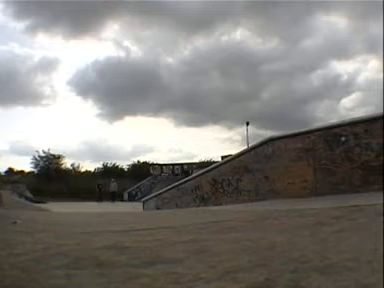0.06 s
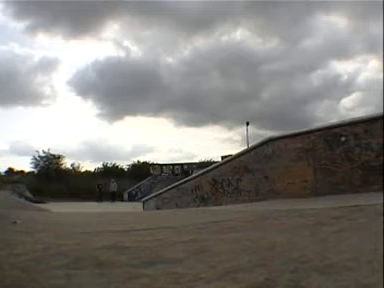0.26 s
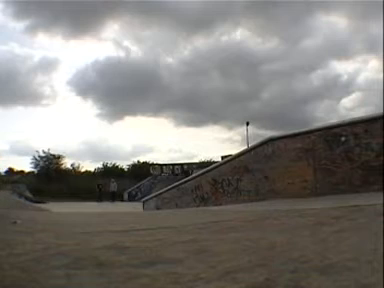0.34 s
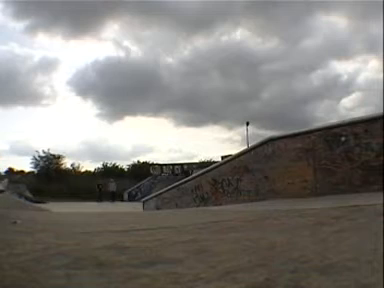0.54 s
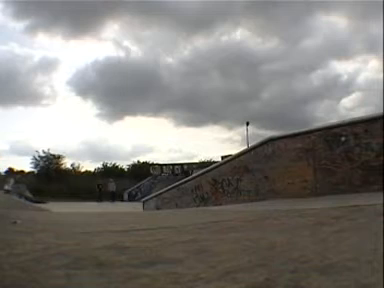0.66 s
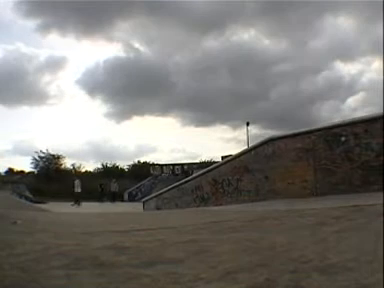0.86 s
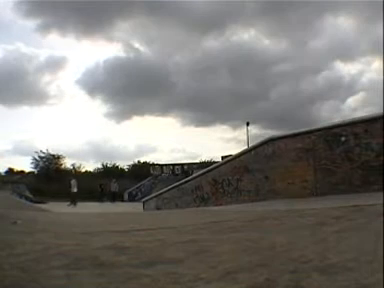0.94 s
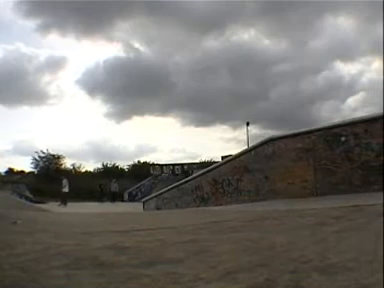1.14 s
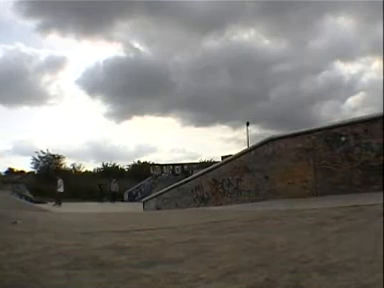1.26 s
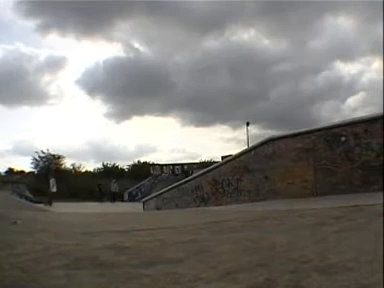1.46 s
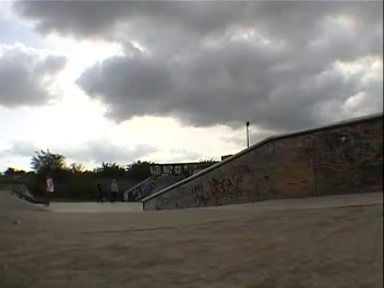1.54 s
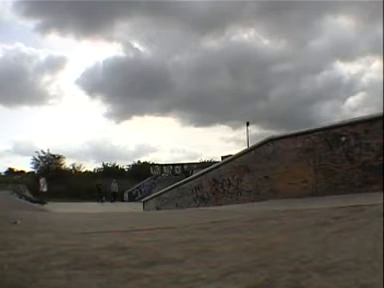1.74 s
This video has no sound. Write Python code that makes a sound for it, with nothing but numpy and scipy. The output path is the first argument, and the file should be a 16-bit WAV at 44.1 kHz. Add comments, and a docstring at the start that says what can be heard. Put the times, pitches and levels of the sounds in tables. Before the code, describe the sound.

Skates thump across a hollow ramp close to the microphone, clacking three times as the panels ring briefly. The wheels then roll away over rough concrete, with a few small distant clacks and a steady low hum in an outdoor skatepark.

```python
"""A skater crosses a hollow ramp close by in an outdoor skatepark.
The wheels thump on its panels and set them ringing, and the hard skates clack three times.
The wheels then roll away over rough concrete, with a few small clacks from farther off, above
a steady outdoor hum. Ramps and walls add a thin echo. The recorder's motor-noise filter cuts
a row of narrow gaps in the sound, and its input rounds the loudest peaks."""
import sys
import numpy as np
from scipy import signal
from scipy.fft import rfft, irfft
from scipy.io import wavfile

SR = 44100
rng = np.random.default_rng(int(sys.argv[2]) if len(sys.argv) > 2 else 0)


def unload_wav(signal):
    """Save mono or channel-first audio to the path in sys.argv[1] as 16-bit WAV at rate SR, clipped to [-1, 1]."""
    wavfile.write(
        sys.argv[1],
        SR,
        np.round(np.clip(np.atleast_2d(signal).T, -1, 1) * 32767).astype(np.int16),
    )


N = 79380
TIME = np.arange(N) / SR
HZ = np.maximum(np.fft.rfftfreq(N, 1 / SR), 1)
TILT_PIVOT_HZ = 360  # a positive tilt boosts the sound above this pitch and weakens it below

# Tone of the bright rattle in a clack. Each row: frequency in Hz, relative level in dB.
RATTLE_TONE = [(1200, -50), (2800, 5), (3800, -3.5), (4600, 0), (6000, 4.5), (7800, 1.5), (9200, -11.5),
               (11000, -19), (13000, -43.5), (16000, -44)]


def ramp():
    """Wheels strike the hollow ramp: its frame booms, its panels knock and each struck spot rings."""
    # Each row: start in seconds, frame boom in dB, panel knock in dB, knock tilt in dB per octave,
    # then the spot's own note: level in dB, pitch in Hz, fade time in seconds.
    knocks = [(.240, -46, -31, 8.5, -33.5, 649, 0.22), (0.3483, -30, -8.5, 1, -14, 818, 0.041),
              (.3555, -28, -11, -2, -5.5, 399, 0.059), (.365, -25, -13, -7, -9.5, 264, 0.078),
              (.424, -28, -23, 5.5, -23, 131.2, 0.32), (0.7225, -11, -13, -1, -10.5, 489, 0.066),
              (0.7291, -36, -22.5, 3, -12, 662, .08), (0.7363, -16, -18.5, -1, -12.5, 169.7, .1),
              (0.8811, -49, -16.5, 3, -23, 371, 0.14), (.907, -33, -19.5, -1, -14, 274.6, 0.15)]
    # Notes of the frame and the panels. Each row: pitch in Hz, level in dB, fade time in seconds.
    frame_notes = [(82, -3.5, 0.17), (162, -3.5, 0.12)]
    panel_notes = [(208.8, -10.5, 0.15), (254.8, -5, 0.23), (332.2, -5.5, 0.21), (413.8, -6.5, 0.12),
                   (520.4, -10.5, 0.2), (706.6, -9.5, 0.11), (784, -13, 0.11)]
    # Many weaker notes blur into a thud. Each row: frequency in Hz, relative level in dB.
    thud_tone = [(25, -47), (60, -22.5), (160, -20.5), (230, 7.5), (500, 10), (800, -7.5), (1100, -9.5),
                 (2000, -34), (6000, -63)]
    # Soft, low bumps before the landing. Each row: start in seconds, level in dB, pitch in Hz.
    soft_bumps = [(0.1714, -15, 108.7), (0.209, -12, 119)]
    bumps = sum(note(start, db, hz, fade_s=0.08) for start, db, hz in soft_bumps)
    frame = ring(frame_notes, [(start, db, 0) for start, db, *_ in knocks])
    panels = ring(panel_notes, [(start, db - 1.5, tilt) for start, _, db, tilt, *_ in knocks])
    hollow = sum(note(start, db, hz, fade_s) for start, *_, db, hz, fade_s in knocks)
    octaves = np.clip(np.log2(HZ / TILT_PIVOT_HZ), -1, 2)
    thud = 0
    for start, _, db, tilt, *_ in knocks:
        tilted_tone = tone(thud_tone) * from_db(tilt * octaves)
        thud += from_db(db - 2.5) * blow(start, fade_s=0.15) * noise(tilted_tone)
    low_cut = signal.butter(2, 63, "high", fs=SR, output="sos")
    return signal.sosfilt(low_cut, thud + panels + hollow + frame - bumps)


def skates():
    """The skates' wheels, frames and shells clack, scrape and ring, with a gritty bright rattle."""
    # Each row: start in seconds, clack in dB, rattle in dB, scrape length and fade time in seconds.
    hits = [(0.3485, -21.5, -41, .0005, .06), (0.3551, -14, -37, 0.0022, 0.079),
            (0.3646, -20, -27, .003, .06), (.372, -21, -31, 0.0096, 0.13), (0.42, -24, -39.5, 0.016, 0.088),
            (0.485, -27.5, -39.5, 0.021, 0.089), (.538, -38, -48, 0.034, 0.065),
            (.604, -46, -52, 0.018, 0.08), (0.69, -31.5, -50.5, 0.0019, 0.065),
            (0.7217, -27, -62, 0.00093, 0.025), (0.7353, -21.5, -45, 0.00089, 0.032),
            (.8796, -24, -28.5, .0003, .1), (0.891, -31, -33, 0.012, 0.12), (.907, -28.5, -33, .013, 0.25)]
    # Tone of a clack. Each row: frequency in Hz, relative level in dB.
    clack_tone = [(200, -26), (600, 9.5), (1000, 3.5), (1700, 2), (2400, -3), (3300, -13.5), (5000, -25),
                  (14000, -55)]
    # Notes of the hard parts. Each row: pitch in Hz, level in dB, fade time in seconds.
    skate_notes = [(1247, 2, 0.13), (1582, -11, 0.13), (1756, -12, 0.36), (1910, -17, 0.1),
                   (1980, -16.5, 0.35), (2490, -13, 0.1), (3760, -8.5, 0.099)]
    clack_level = blows([(db, start, fade_s, scrape_s) for start, db, _, scrape_s, fade_s in hits])
    rattle_level = blows([(db, start, fade_s, scrape_s) for start, _, db, scrape_s, fade_s in hits])
    clatter = clack_level * noise(tone(clack_tone)) + rattle_level * noise(tone(RATTLE_TONE))
    # A clack that is damped sooner rings more weakly.
    ring_db, free_fade_s = -5, 0.18
    strikes = [(start, db + ring_db + 20 * np.log10(fade_s / free_fade_s), 0)
               for start, db, _, _, fade_s in hits]
    ringing = ring(skate_notes, strikes)
    return pan(clatter * grain(depth_db=2.5) + ringing, right_db=3.5)


def snaps():
    """A wheel's first hard contact gives a tiny burst of crackle."""
    # Each row: start in seconds, level in dB.
    contacts = [(0.349, -36), (.356, -27), (0.366, -24), (.7228, -44), (0.7366, -27.5), (.8803, -36)]
    decay_s, top_hz = 0.0007, 7000
    level = sum(from_db(db) * (TIME >= start) * np.exp(-np.abs(TIME - start) / decay_s)
                for start, db in contacts)
    return signal.sosfilt(signal.butter(1, top_hz, fs=SR, output="sos"), level * noise(1))


def rolling():
    """The wheels rumble on the ramp, then roar more brightly on rough concrete."""
    # Loudness of the rolling. Each row: time in seconds, level in dB.
    levels = [(0, -39), (.33, -39.5), (.45, -33), (.65, -32.5), (.84, -43.5), (1.0, -33.5), (1.2, -33),
              (1.62, -34), (1.8, -38.5)]
    # Tone of each surface. Each row: frequency in Hz, relative level in dB.
    ramp_tone = [(25, -17), (60, 0), (95, -7.5), (128, 6), (170, -5), (245, 7), (310, -5), (380, -2),
                 (650, -3), (1000, -14.5), (1800, -18), (2400, -24.5), (7000, -37.5), (14000, -67)]
    concrete_tone = [(40, -21), (130, -25), (300, -4.5), (520, 3), (800, -1), (1250, -2), (1800, -6),
                     (2300, -21.5), (4000, -29), (7500, -34), (12000, -49.5), (15000, -68)]
    leaves_ramp_s, crossing_s = 1.083, 0.79
    concrete_share = np.clip(0.5 + (TIME - leaves_ramp_s) / crossing_s, 0, 1)
    on_ramp = np.sqrt(1 - concrete_share) * noise(tone(ramp_tone))
    on_concrete = np.sqrt(concrete_share) * noise(tone(concrete_tone))
    return loudness(levels) * grain(depth_db=2) * (on_ramp + on_concrete)


def whine():
    """The rolling wheels sing briefly around one pitch."""
    # Each row: time in seconds, level in dB.
    levels = [(1.0, -64), (1.36, -55), (1.425, -41.5), (1.485, -36.5), (1.65, -68)]
    return loudness(levels) * noise(band(1626, width_octaves=0.022))


def far_clacks():
    """Small clacks farther off each ring around one pitch; the harder ones have a crisp top."""
    # Each row: start in seconds, level in dB, pitch in Hz, crisp top in dB.
    hits = [(.168, -39, 1640, -71), (.687, -36.5, 3450, -63), (0.6879, -28, 1500, -68),
            (1.462, -43, 3000, -67), (1.513, -38, 3340, -55), (1.528, -38.5, 2980, -58),
            (1.5806, -33, 3570, -47), (1.634, -29, 1750, -65), (1.728, -45, 3340, -56),
            (1.734, -32, 780, -64)]
    crisp = noise(band(7450, width_octaves=0.48) * tone(RATTLE_TONE) ** 0.25)
    clacks = 0
    for start, db, hz, top_db in hits:
        body = from_db(db) * noise(band(hz, width_octaves=0.23))
        clacks += blow(start, fade_s=0.05, scrape_s=0.0037) * (body + from_db(top_db) * crisp)
    return grain(depth_db=4) * clacks


def park_echo(sound):
    """Ramps and walls scatter the sound into a thin tail."""
    # Tone of the echo. Each row: frequency in Hz, relative level in dB.
    echo_tone = [(60, 6.5), (250, 1), (600, 0.5), (1500, -10), (3000, 2.5), (7000, -8), (12000, -4)]
    echo_db, build_s, fade_s = -15.5, 0.0078, 0.79
    shape = (1 - np.exp(-TIME / build_s)) * from_db(-60 * TIME / fade_s)
    tail = unit_level(noise(tone(echo_tone)) * shape) / np.sqrt(N)
    return from_db(echo_db) * signal.fftconvolve(sound, tail, axes=1)[:, :N]


def outdoors():
    """A distant wash of noise with a low, wavering hum."""
    # Tone of the wash. Each row: frequency in Hz, relative level in dB.
    wash_tone = [(25, -25), (60, -6.5), (120, -4.5), (240, -2), (400, -6), (700, -11), (1500, -15.5),
                 (2500, -31.5), (5000, -49), (12000, -51), (15000, -85)]
    wash = from_db(-41) * noise(tone(wash_tone))
    hum = from_db(-45.5) * noise(band(134.4, width_octaves=0.22))
    return wash + hum


def breeze():
    """Moving air gives each microphone opening its own faint rumble."""
    # Tone of the rumble. Each row: frequency in Hz, relative level in dB.
    rumble_tone = [(20, 14), (60, -9.5), (120, -18), (300, -18), (1000, -47)]
    spectrum = rfft(rng.standard_normal((2, N))) * tone(rumble_tone)
    return from_db(-57) * unit_level(irfft(spectrum, N))


def blow(start, fade_s, scrape_s=0):
    """Loudness of a hit: it rises, holds while it scrapes, then drops 60 dB in the fade time."""
    age = np.maximum(TIME - start, 0)
    rise_s = 0.00044 + 0.12 * scrape_s  # a longer scrape starts more gently
    return (1 - np.exp(-age / rise_s)) * from_db(-60 * np.maximum(age - scrape_s, 0) / fade_s)


def blows(hits):
    """Loudness of several hits together; their powers add up."""
    return np.sqrt(sum((from_db(db) * blow(*timing)) ** 2 for db, *timing in hits))


def note(start, db, hz, fade_s):
    """One struck note dying away."""
    return from_db(db) * blow(start, fade_s) * np.sin(2 * np.pi * hz * (TIME - start))


def ring(notes, strikes, spread_db=0.55):
    """Each strike sets all of an object's notes ringing, with slightly random strengths."""
    sound = np.zeros(N)
    for start, db, tilt in strikes:
        age = np.maximum(TIME - start, 0)
        for hz, note_db, fade_s in notes:
            level = db + note_db + tilt * np.log2(hz / TILT_PIVOT_HZ) + spread_db * rng.standard_normal()
            sound += from_db(level - 60 * age / fade_s) * np.sin(2 * np.pi * hz * age)
    return sound


def grain(depth_db, step_s=0.0013):
    """Tiny contacts make the loudness flicker quickly."""
    steps = np.arange(0, 2, step_s)
    flicker = np.interp(TIME, steps, rng.standard_normal(len(steps)))
    return unit_level(from_db(depth_db * flicker))


def noise(gain):
    """Stereo noise with the given tone; left and right are most alike in the bass."""
    # Each row: frequency in Hz, likeness of left and right from 0 to 1.
    likeness = [(25, 0.9), (80, 1), (250, 0.99), (600, .97), (1100, 0.88), (2000, 0.88), (8000, 0.38)]
    alike = per_hz(likeness)
    middle, side = rfft(rng.standard_normal((2, N)))
    spectrum = np.sqrt(1 + alike) * middle + np.sqrt(1 - alike) * side * [[1], [-1]]
    return unit_level(irfft(gain * spectrum, N))


def band(hz, width_octaves):
    """Gain that favours the frequencies around one pitch."""
    return 1 / np.sqrt(1 + (np.log2(HZ / hz) / width_octaves) ** 4)


def per_hz(points):
    """Join a table's points into a value for every frequency."""
    hz, value = np.transpose(points)
    return np.interp(np.log(HZ), np.log(hz), value)


def tone(points):
    """Gain at every frequency, from a table in dB."""
    return from_db(per_hz(points))


def loudness(points):
    """Gain at every moment, from a table in dB."""
    return from_db(np.interp(TIME, *np.transpose(points)))


def from_db(db):
    """Turn decibels into a gain to multiply by."""
    return 10 ** (np.asarray(db) / 20)


def unit_level(sound):
    """Scale to an average power of 1."""
    return sound / np.sqrt(np.mean(sound ** 2) + 1e-20)


def pan(stereo, right_db):
    """Make the right side louder than the left (quieter if negative)."""
    return stereo * from_db([[-right_db / 2], [right_db / 2]])


def from_the_right(stereo, lag_s):
    """Sound from the right reaches the left microphone slightly later."""
    return np.array([np.interp(TIME - lag_s, TIME, stereo[0]), stereo[1]])


def scene():
    """Near hits, far clacks and their echoes over the rolling and the background."""
    thumps = from_the_right(ramp(), lag_s=0.000099)
    clacks = from_the_right(skates() + snaps(), lag_s=0.00005)
    hits = thumps + clacks + far_clacks()
    wheels = pan(rolling() + whine(), right_db=-0.4)
    return hits + park_echo(hits) + wheels + outdoors() + breeze()


def record(dry):
    """The recorder filters out motor noise, rounds the peaks and cuts the highest treble."""
    motor_hz, memory, depth = 150, 0.55, 0.85
    ceiling, top_hz = 0.65, 15800
    # Subtracting an average of past motor turns cuts a gap at every multiple of motor_hz.
    one_turn_delay = np.exp(-2j * np.pi * np.fft.rfftfreq(2 * N, 1 / SR) / motor_hz)
    past_turns = (1 - memory) * one_turn_delay / (1 - memory * one_turn_delay)
    filtered = irfft(rfft(dry, 2 * N) * (1 - depth * past_turns))[:, :N]
    rounded = ceiling * np.tanh(filtered / ceiling)
    return signal.sosfilt(signal.cheby2(12, 70, top_hz, fs=SR, output="sos"), rounded)


dry = scene()
out = record(dry)
unload_wav(out)
```